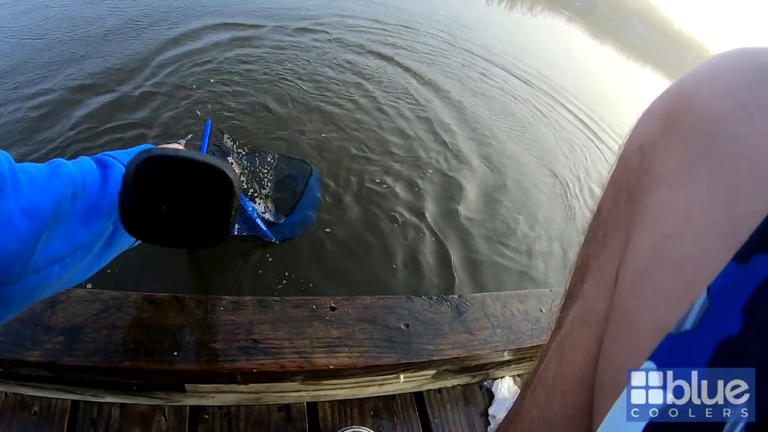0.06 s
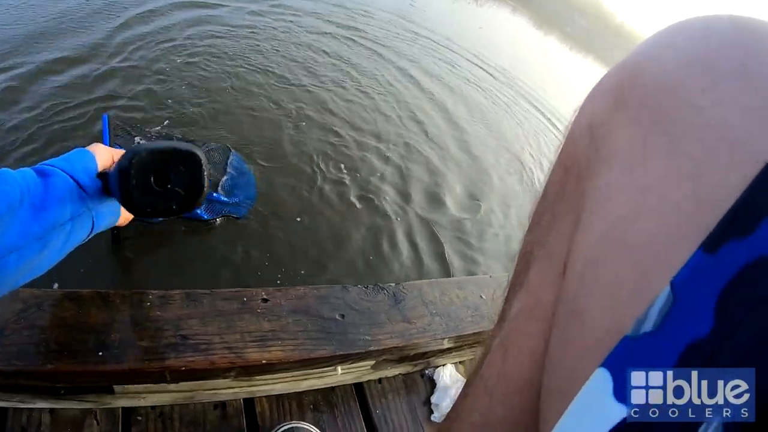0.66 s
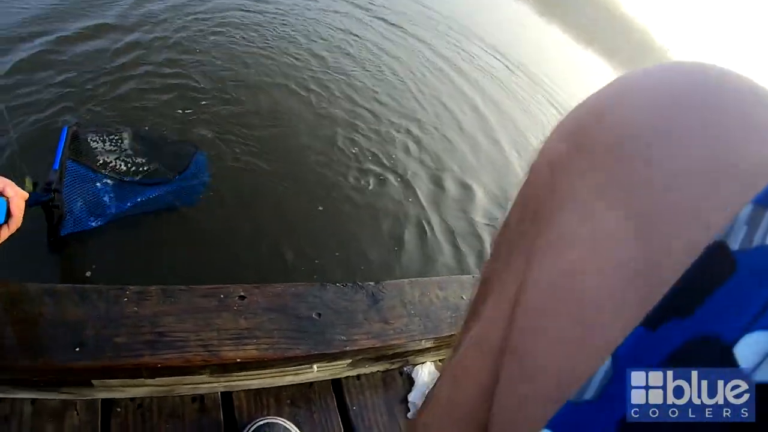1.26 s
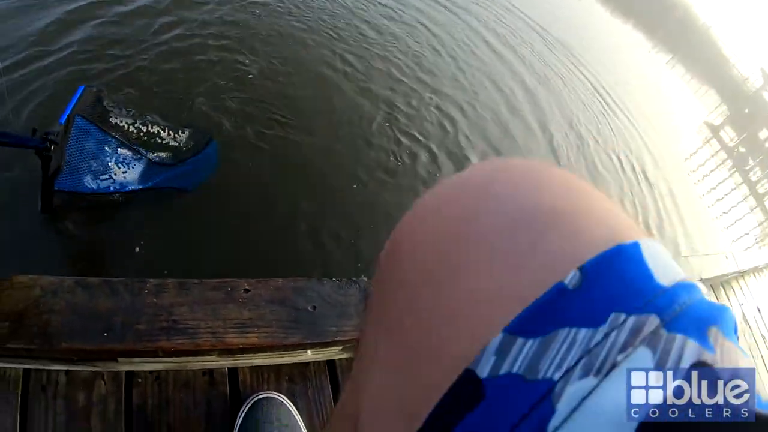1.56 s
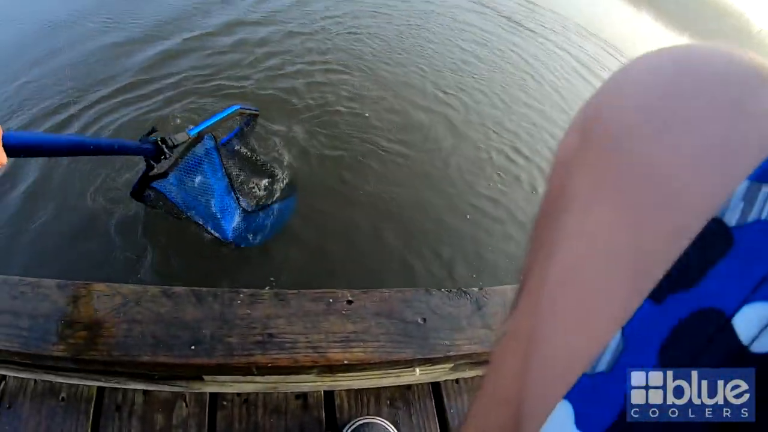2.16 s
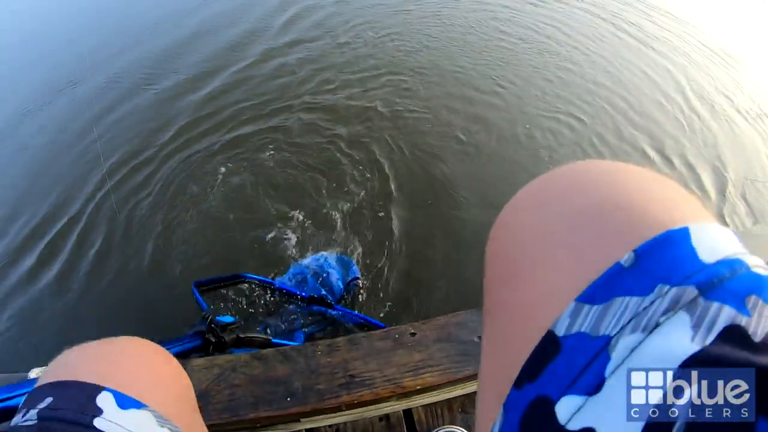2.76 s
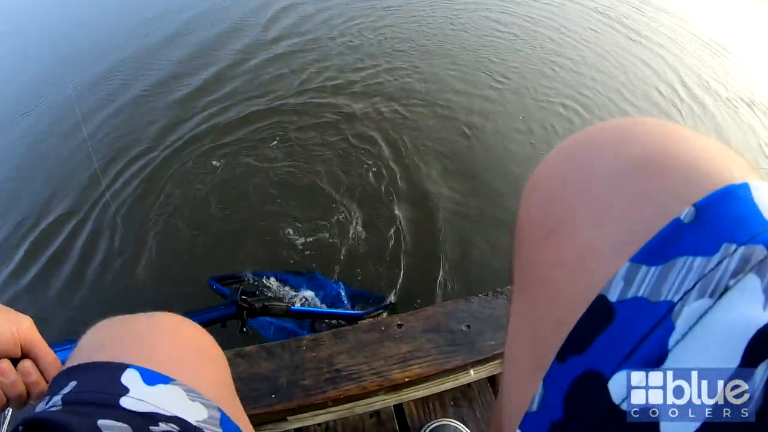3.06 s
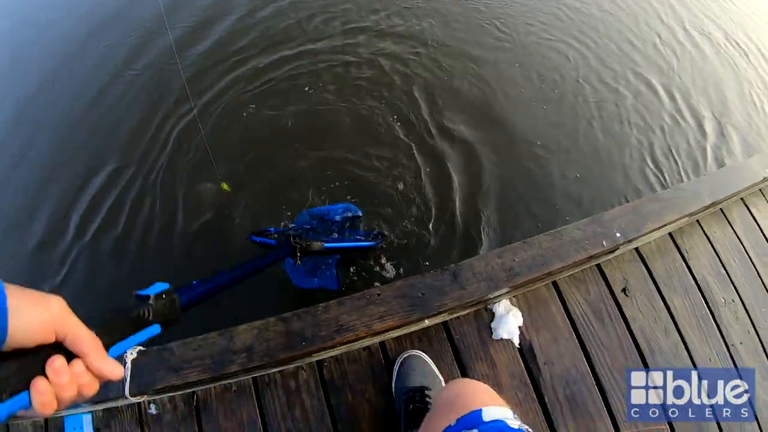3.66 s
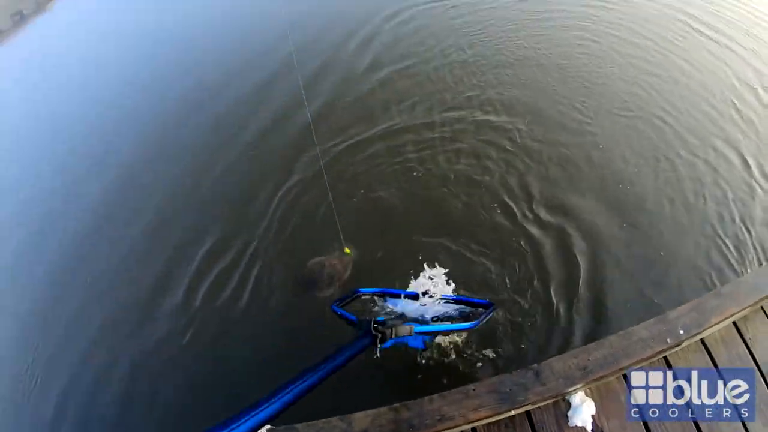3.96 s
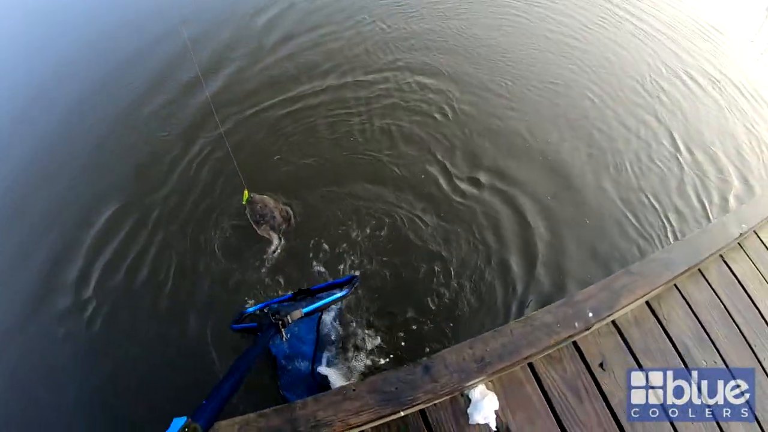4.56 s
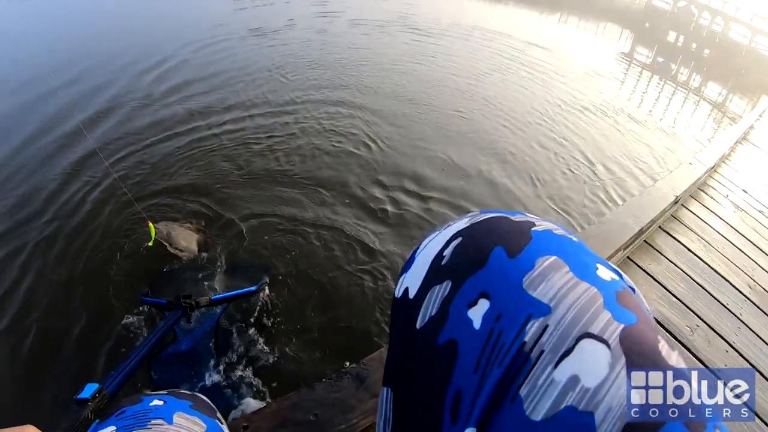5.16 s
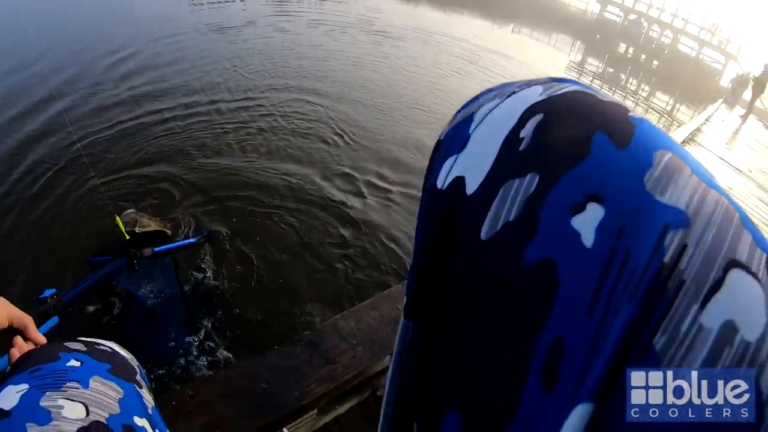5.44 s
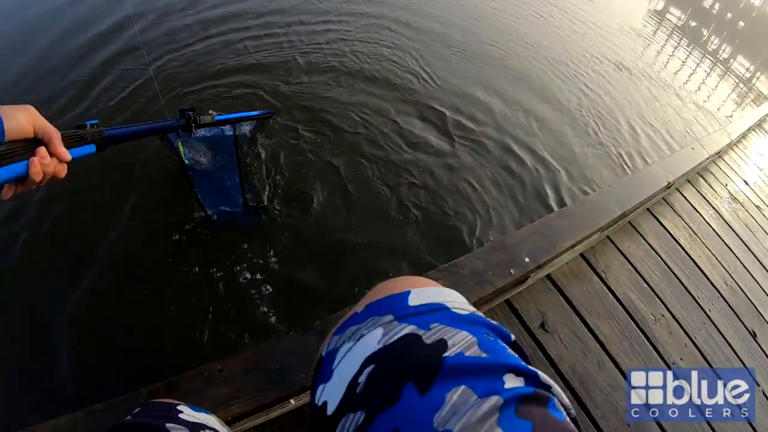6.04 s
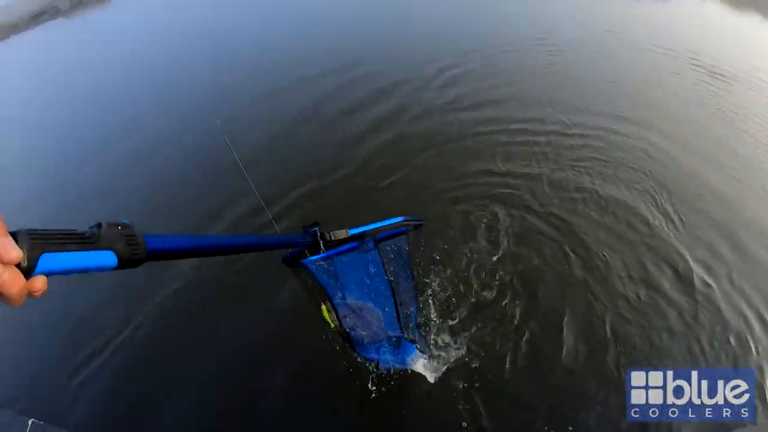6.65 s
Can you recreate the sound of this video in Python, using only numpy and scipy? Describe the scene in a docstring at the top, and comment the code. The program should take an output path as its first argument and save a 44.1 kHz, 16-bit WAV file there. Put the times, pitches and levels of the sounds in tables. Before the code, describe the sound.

Outdoors, a step from a body-worn microphone, water bubbles and drains through a net swept beside a dock. The hoop gives a hollow clack on the wood, followed by plops and a tiny scrape. Amid low thumps on the boards and puffs of wind, a fish splashes and flings drops onto the microphone in two loud, crackling bursts. The water churns, settles and is gently stirred again.

```python
"""Landing net beside a wooden dock

A net is swept through the water, and the bubbles it traps resonate as it gurgles and drains. The hoop
knocks on the dock, the mesh scrapes its edge and feet thump on the planks. A hooked fish splashes, and
two showers of drops strike a body-worn microphone. Light wind and open air lie underneath."""
import sys
import numpy as np
from scipy import signal
from scipy.fft import rfft, irfft, next_fast_len
from scipy.io import wavfile
from scipy.ndimage import uniform_filter1d

SR = 44100
rng = np.random.default_rng(int(sys.argv[2]) if len(sys.argv) > 2 else 0)


def generate_wav(sig):
    """Save sig (samples, or channels by samples) to the path in sys.argv[1] as 16-bit PCM at SR."""
    pcm = np.round(np.clip(np.atleast_2d(sig).T, -1, 1) * 32767).astype(np.int16)
    wavfile.write(sys.argv[1], SR, pcm)


N = 299992

# Shoves of net or fish. Each row: crest, swell and drain times in seconds, gurgle and fizz levels in dB,
# churn (0 separate bubbles, 1 dense froth), depth (0 light surface trickle, 1 hollow gurgle).
WATER_SURGES = [(1.68, 0.092, 0.35, -54, -67, .25, 0.28), (1.82, 0.063, 0.15, -60, -80, 0.2, 0.5),
                (2.06, 0.39, 0.25, -59, -71, 0.15, 0.45), (2.74, 0.4, 0.28, -65.5, -67, 0.55, 0.36),
                (2.87, 0.13, 0.046, -55.5, -56, 0.9, 0.95), (2.995, 0.12, 0.073, -52.5, -59.5, 0.62, 0.46),
                (3.945, 0.15, 0.11, -47.5, -54, 0.85, 0.33), (4.2, 0.39, 0.67, -53, -64.5, 0.76, 0.47),
                (4.455, 0.14, 0.18, -51.5, -54, 0.94, 0.45),
                (4.785, 0.059, 0.042, -47.5, -53.5, 0.45, 0.88), (5.03, 0.28, 0.43, -62.5, -67, 0.54, 0.29),
                (6.12, 0.18, 0.099, -56.5, -68, 0.45, 0.099), (6.35, 0.11, 0.048, -72, -62.5, .3, .1),
                (6.54, 0.17, 0.19, -56.5, -66, 0.68, 0.22), (6.72, 0.34, 0.91, -66, -67, 0.82, .39)]
# Single bubbles that stand out, from low plops to tiny high plips. Each row: start in seconds,
# pitch in Hz, level in dB, t60 in seconds, glide in octaves per t60.
DISTINCT_BUBBLES = [(.812, 256, -40.5, 0.05, -1.5), (1.126, 520, -34, 0.011, 0),
                    (1.319, 916, -47, 0.041, 0.5), (1.607, 986, -42.5, 0.025, 3),
                    (1.627, 385, -44.5, 0.049, 0), (1.652, 3170, -48, .025, 0.6),
                    (1.705, 436, -45.5, 0.15, 0.3), (1.706, 677, -42.5, 0.037, 1.5),
                    (1.764, 593, -44.5, 0.18, 2), (1.772, 1590, -51, 0.052, -1),
                    (1.836, 687, -42.5, 0.072, 0), (1.852, 990, -46, 0.038, 0),
                    (1.887, 650, -29.5, 0.014, 1.5), (1.893, 317, -36.5, 0.19, 0.16),
                    (1.929, 1350, -50.5, 0.1, .3), (1.941, 3360, -48.5, 0.018, -0.5),
                    (1.971, 376, -37.5, 0.23, 0.5), (2.098, 740, -45.5, 0.07, -0.5),
                    (2.099, 3570, -46, 0.015, 0.1), (2.759, 798, -46.5, 0.074, 0.5),
                    (2.798, 780, -44, 0.027, 0.5), (2.969, 443, -30, 0.019, 1),
                    (2.98, 1195, -28.5, 0.014, 0.8), (3.007, 362, -25, 0.023, 0.5),
                    (3.02, 700, -36, 0.028, 2), (3.028, 390, -32, 0.018, -0.5),
                    (3.025, 192, -39, 0.13, 0.5), (3.26, 386, -43, 0.053, 1.7), (3.915, 567, -33, 0.028, 0),
                    (3.931, 483, -38, 0.05, 0), (4.012, 557, -43.5, 0.2, 0.7), (4.198, 690, -44, 0.025, 1),
                    (4.224, 700, -44, 0.073, 1.2), (4.25, 627, -41, .04, -1.5), (4.286, 730, -37, 0.039, 0),
                    (4.484, 450, -43, 0.081, -0.5), (4.777, 520, -41, 0.02, -1.5),
                    (4.7915, 244, -30, 0.05, 2), (4.8, 158, -32, 0.089, 0.5), (4.897, 255, -39.5, 0.058, 2),
                    (4.954, 451, -38.5, 0.048, 1.1), (5.917, 637, -46.5, 0.08, 3.5),
                    (5.93, 1225, -48, 0.033, 1), (5.997, 686, -49, 0.069, 2), (6.05, 773, -51, 0.081, 1),
                    (6.066, 956, -41, 0.039, 1), (6.123, 662, -45.5, 0.1, 0.6),
                    (6.173, 903, -38.5, 0.047, -1.3), (6.419, 1520, -37.5, 0.021, 0.7),
                    (6.435, 1490, -47, 0.032, -0.5), (6.518, 754, -41.5, 0.04, -0.5),
                    (6.664, 1464, -43.5, 0.03, 0)]
# Plips, slaps and ticks of water and tackle. Each row: start in seconds, level in dB, centre in Hz,
# t60 in seconds.
WATER_TICKS = [(1.126, -54, 1500, 0.01), (1.31, -54, 1650, 0.026), (1.7518, -51.5, 5670, 0.023),
               (1.876, -42.5, 1150, 0.031), (1.971, -49.5, 1640, 0.036), (2.713, -45, 3400, 0.013),
               (3.411, -51.5, 2630, 0.074), (3.513, -40.5, 1520, 0.025), (3.566, -46.5, 1330, 0.023),
               (3.757, -34.5, 3180, 0.0031), (3.833, -47.5, 4400, .012), (3.8742, -39.5, 880, 0.018),
               (3.905, -38, 1500, 0.035), (3.923, -38, 1940, 0.028), (4.195, -48.5, 1900, 0.024),
               (4.3214, -41, 2290, 0.014), (4.373, -51, 1200, 0.012), (4.4256, -46, 1540, 0.014),
               (4.49, -46.5, 5150, 0.013), (4.537, -43.5, 1710, 0.02), (4.576, -46, 4270, 0.01),
               (4.6397, -32, 2220, 0.0058), (4.6624, -34, 2150, 0.0081), (4.785, -39.5, 1780, 0.025),
               (4.799, -34.5, 637, 0.019), (4.783, -42.5, 3500, 0.032), (4.798, -36.5, 1660, 0.018),
               (5.075, -41, 1970, 0.017), (5.6657, -37.5, 2300, 0.0079), (5.6653, -32.5, 3870, 0.0067),
               (5.6654, -40, 5530, 0.0062), (6.134, -53, 3200, 0.022), (6.385, -44.5, 3560, 0.013),
               (6.418, -47, 2080, 0.016)]
# Drops striking the microphone. Each row: start in seconds, level in dB.
DROP_HITS = [(3.9666, -14), (3.9727, -7.5), (3.979, -12.5), (3.9827, -14.5), (4.0858, -26), (4.1004, -4),
             (4.117, -8.5), (4.132, -16)]
# Fine spray around the drops. Each row: start in seconds, length in seconds, level in dB.
MIST_SHOWERS = [(3.816, 0.0038, -54.5), (3.961, 0.019, -39.5), (4.085, 0.0049, -55), (4.095, 0.03, -40)]
# The hoop striking the dock. Each row: start in seconds, ring level in dB, crack level in dB.
HOOP_KNOCKS = [(2.8203, -24, -20.5), (2.826, -25.5, -23.5), (2.8306, -41, -31.5), (2.8341, -42, -46),
               (2.84, -40, -38), (2.858, -53, -58), (2.866, -51, -47), (2.8845, -40, -44),
               (2.9013, -43.5, -34.5), (3.0095, -45.5, -38)]
# Modes of hoop and planks. Each row: frequency in Hz, relative level in dB, t60 in seconds.
HOOP_PLANK_MODES = [(145, -13, 0.28), (213, -15, 0.11), (260, 1, .15), (313, -7.5, 0.089), (359, -9.5, 0.1),
                    (466, -8, 0.13), (664, -17, 0.091), (800, 0.5, 0.032), (900, -18, 0.045),
                    (1160, -7, 0.035), (1894, -15.5, 0.037), (2205, -15.5, 0.041), (2905, -16.5, 0.04),
                    (3980, -17.5, 0.04), (4940, -17.5, 0.043)]
# Feet, knees and net on the planks. Each row: start in seconds, level in dB.
PLANK_THUMPS = [(1.356, -38), (1.432, -30), (1.555, -32), (2.827, -33), (3.398, -35.5), (3.866, -25),
                (4.054, -24), (4.294, -30.5), (4.483, -34.5), (5.191, -43), (5.723, -41.5)]
# Puffs of air on the microphone. Each row: peak time in seconds, 1/e half width in seconds, level in dB.
WIND_GUSTS = [(1.08, 0.036, -47), (1.25, 0.027, -40.5), (1.47, 0.26, -53.5), (2.88, 0.078, -48.5),
              (3.866, 0.049, -30.5), (3.991, 0.043, -25.5), (4.15, 0.19, -49.5), (5.72, 0.11, -58)]

# Spectral envelopes. Each row: frequency in Hz, relative level in dB.
GURGLE_SPECTRUM = [(120, -36), (300, 1.5), (500, 6.5), (800, 2.5), (1100, -3), (1600, -6.5), (2600, -12),
                   (5000, -20), (12000, -57)]  # mid-sized bubbles
FIZZ_SPECTRUM = [(700, -4), (1500, 3.5), (2400, 1.5), (4000, -6.5), (6500, -12), (8000, -17), (10000, -21),
                 (15000, -30)]  # tiny bubbles
SNAP_SPECTRUM = [(150, -17), (600, 5), (3000, -17), (15000, -40)]  # a bubble pinching off
CRACK_SPECTRUM = [(150, 12), (450, 22), (900, 11), (1400, 10), (2200, 9.5), (3200, 4), (5000, -1),
                  (6200, -7), (8500, -9.5), (11000, -32), (15000, -52)]  # the sharp onset of a knock
THUD_SPECTRUM = [(60, -13), (200, 0), (420, -7), (1500, -49)]  # its dull body
SCRAPE_SPECTRUM = [(1500, -5), (4800, 0), (8000, -5), (11000, -23)]  # mesh rubbing on wood
BUFFET_SPECTRUM = [(8, -17), (20, -16.5), (32, -2.5), (50, -12.5), (100, -25.5), (200, -30), (500, -45),
                   (1500, -106)]  # wind on the microphone
SWAY_SPECTRUM = [(2, -10.5), (9, 0.5), (22, -18.5), (50, -102)]  # slow pressure swings in the breeze
HUSH_SPECTRUM = [(41, -14), (70, 2.5), (177, -4.5), (291, -10), (417, -10), (572, -17), (734, -15),
                 (1730, -27.5), (7030, -34.5), (13500, -35.5), (15500, -43.5)]  # open air
DRONE_SPECTRUM = [(150, -31), (490, 6), (590, -2), (1100, -45)]  # a far-off drone


def slosh(split_hz=800, clump_db=4, glugs_db=-2, splats_db=-1, chirps_db=-6):
    """Bubble resonance: the mesh traps air; mid-sized bubbles gurgle, tiny ones fizz, dense ones froth."""
    gurgle_gain, fizz_gain, churn, depth = stirring()
    pockets = colour(swarm(308, 2310, cycles=15, spread_db=20.5, rise=0.17, count=2800), GURGLE_SPECTRUM)
    glugs = colour(swarm(402, 1770, cycles=30, spread_db=18, rise=0.46, count=500), GURGLE_SPECTRUM)
    beads = colour(swarm(2030, 8200, cycles=16, spread_db=18, rise=0.041, count=3000), FIZZ_SPECTRUM)
    clumps = amp(clump_db * wander(350))  # water falls back in dollops
    boil = colour(clumps * patter(per_s=3000, spread_db=2), GURGLE_SPECTRUM)
    splats = unit(patter(per_s=120, spread_db=3))  # single drops on the surface
    foam = unit(clumps * patter(per_s=3000, spread_db=0))
    froth = colour(foam + amp(splats_db) * splats, FIZZ_SPECTRUM)
    gurgle = np.sqrt(1 - churn) * unit(pockets + amp(glugs_db) * glugs) + np.sqrt(churn) * boil
    fizz = np.sqrt(1 - churn) * beads + np.sqrt(churn) * froth
    hollow, light = split(gurgle, split_hz)
    # small pockets at the very surface chirp upwards
    chirps = unit(swarm(608, 1670, cycles=32, spread_db=-4, rise=0.72, count=420))
    light += amp(chirps_db) * (1 - depth) ** 2 * chirps
    gurgle = np.sqrt(2 * depth) * hollow + np.sqrt(2 * (1 - depth)) * light
    return gurgle * gurgle_gain + fizz * fizz_gain


def stirring(drop_db=15, roundness=1.21, trickle_gurgle_db=-75, trickle_fizz_db=-80):
    """Incoherent addition: surges sum in power, and the strongest dominates the churn and depth."""
    t = np.arange(0, N + 64, 64) / SR
    crest, swell, drain, gurgle_db, fizz_db, churns, depths = np.transpose(WATER_SURGES)[:, :, None]
    from_crest = np.maximum((crest - t) / swell, (t - crest) / drain)
    fall_db = np.minimum(drop_db * from_crest ** roundness, 100)
    surge_powers = amp(gurgle_db - fall_db) ** 2
    trickle_power = amp(trickle_gurgle_db) ** 2  # the wet mesh trickles between shoves
    gurgle_power = surge_powers.sum(0) + trickle_power
    fizz_power = (amp(fizz_db - fall_db) ** 2).sum(0) + amp(trickle_fizz_db) ** 2
    churn = np.clip(((churns * surge_powers).sum(0) + trickle_power) / gurgle_power, 0, 1)
    depth = np.clip(((depths * surge_powers).sum(0) + 0.5 * trickle_power) / gurgle_power, 0, 1)
    controls = np.sqrt(gurgle_power), np.sqrt(fizz_power), churn, depth
    return [np.interp(np.arange(N) / SR, t, control) for control in controls]


def swarm(low_hz, high_hz, cycles, spread_db, rise, count):
    """Similar damping ratios: bubbles of assorted sizes each ring for roughly the same number of cycles."""
    out = np.zeros(N)
    for k, (when, size, loud, length, glide) in enumerate(rng.random((count, 5))):
        hz = low_hz * (high_hz / low_hz) ** size
        bubble = ring(hz, cycles * (0.5 + length) / hz, 2 * rise * glide, attack=1 / hz)
        start = (k + 2 * when) / count * N / SR
        add(out, start, hz * amp(spread_db * loud ** 2) * bubble)
    return out


def bubbles(snap_db=-15, snap_t60=0.013, flutter_db=2.5, pitch_spread=0.016):
    """Volume oscillation: single bubbles pinch off with a snap and ring, wavering as they deform."""
    out = np.zeros(N)
    flutter = amp(flutter_db * wander(260))
    waver = 1 + pitch_spread * wander(200)
    for start, hz, db, t60, rise in DISTINCT_BUBBLES:
        samples = len(np.arange(0, t60, 1 / SR))
        pitch = hz * waver[round(start * SR):][:samples]
        add(out, start, amp(db) * ring(pitch, t60, rise, attack=0.00058))
        add(out, start, amp(db + snap_db) * burst(SNAP_SPECTRUM, snap_t60, attack=0.00028))
    return out * flutter


def ticks(skirt_db=-11):
    """Heavy damping: each small impact of water or tackle excites one brief, broad resonance."""
    out = np.zeros(N)
    for start, db, hz, t60 in WATER_TICKS:
        resonance = [(hz / 8, -22), (hz / 1.54, skirt_db), (hz, 0),
                     (hz * 1.19, skirt_db), (hz * 4.3, -36), (hz * 8, -50)]
        add(out, start, amp(db) * burst(resonance, t60, attack=0.00047))
    return out


def spray(swing_gain=0.11, port_hz=350, port_t60=0.0091, longest_mist_t60=0.07, specks_db=-6):
    """Impulse response: each drop on the microphone port gives a sharp spike, then a small low swing."""
    hits, mist = np.zeros((2, N))
    t = np.arange(N) / SR
    for start, db in DROP_HITS:
        add(hits, start, amp([db]))
    for start, length, db in MIST_SHOWERS:
        t60 = longest_mist_t60 * min(1, length / 0.02)
        mist += amp(db) * (t > start) * fade(np.maximum(t - start - length, 0), t60)
    hits += mist * (amp(specks_db) * patter(per_s=2100, spread_db=9) + rng.standard_normal(N))
    response = -swing_gain * ring(port_hz, port_t60, attack=0.0001)
    add(response, 0, np.array([-0.12, 0.85, 0.35, -0.097, -0.018]))  # the spike
    return signal.oaconvolve(hits, response)[:N]


def knocks(crack_t60=0.013, thud_db=-3, thud_t60=0.035, vary_db=4, detune=0.0093):
    """Modal vibration: each contact cracks, thuds and rings hoop and planks, differently at every spot."""
    out = np.zeros(N)
    for start, ring_db, crack_db in HOOP_KNOCKS:
        add(out, start, amp(crack_db) * burst(CRACK_SPECTRUM, crack_t60, attack=0.000092))
        add(out, start, amp(ring_db + thud_db) * burst(THUD_SPECTRUM, thud_t60, attack=0.00033))
        for k, (hz, db, t60) in enumerate(HOOP_PLANK_MODES):
            louder, higher = rng.uniform(-1, 1, 2)
            mode = (-1) ** k * ring(hz * (1 + detune * higher), t60)  # neighbours swing opposite ways
            add(out, start, amp(ring_db + db + vary_db * louder) * mode)
    return out


def scrape(start_s=3.405, end_s=3.511, drag_db=-65.5, click_db=-44):
    """Stick-slip friction: the mesh drags over the edge of the dock and comes free with a click."""
    samples = len(np.arange(0, end_s - start_s, 1 / SR))
    slips = colour(patter(per_s=3300, spread_db=-1)[:samples], SCRAPE_SPECTRUM)
    arch = np.sqrt(np.sin(np.pi * np.arange(samples) / samples))
    out = np.zeros(N)
    add(out, start_s, amp(drag_db) * slips * arch)
    add(out, end_s, amp(click_db) * burst(SCRAPE_SPECTRUM, t60=0.019, attack=0.0001))
    return out


def thumps(plank_hz=101.8):
    """Soft impact: feet, knees and net excite one low, heavily damped mode of the planks."""
    out = np.zeros(N)
    for start, db in PLANK_THUMPS:
        add(out, start, 2 * amp(db) * ring(plank_hz, t60=0.07, rise=-0.41, attack=0.0067))
    return out


def dock_reflections(x, t60=0.12, wet_db=-10, echoes_per_s=2000):
    """Scattering: planks, water and the body add a short, faint tail to the direct sound."""
    t = np.arange(SR // 3) / SR
    echoes = rng.choice([-1, 1], len(t)) * (rng.random(len(t)) < echoes_per_s / SR)
    response = echoes * (t > 0.003) * fade(t, t60)
    return x + amp(wet_db) * signal.oaconvolve(x, response / np.linalg.norm(response))[:N]


def air(hush_db=-57.5, drone_db=-63, breeze_db=-60.5, sway_db=-40, sway_exponent=0.75):
    """Turbulence and ambient noise: wind buffets the microphone over a hush and a fading far-off drone."""
    t = np.arange(N) / SR
    hush_noise, sway_noise, buffet_noise, drone_noise = rng.standard_normal((4, N))
    wind = amp(breeze_db) + sum(amp(db) * np.exp(-((t - s) / width) ** 2) for s, width, db in WIND_GUSTS)
    buffet = colour(buffet_noise, BUFFET_SPECTRUM) * wind
    sway = colour(sway_noise, SWAY_SPECTRUM) * amp(sway_db) * (wind / amp(breeze_db)) ** sway_exponent
    hum, hiss = split(amp(hush_db) * colour(hush_noise, HUSH_SPECTRUM), hz=714)
    hum *= amp(2 - 0.5 * t)  # the low part eases by 0.5 dB a second
    drone = colour(drone_noise, DRONE_SPECTRUM) * amp(drone_db - 14.5 * t)
    return buffet + sway + hum + hiss + drone


def ring(hz, t60, rise=0, attack=0.00036):
    """Damped oscillation: a dying sine that glides by `rise` octaves per t60."""
    t = np.arange(0, t60, 1 / SR)
    phase = 2 * np.pi * np.cumsum(hz * 2 ** (rise * t / t60)) / SR
    return np.sin(phase) * fade(t, t60) * (1 - np.exp(-t / attack))


def burst(spectrum, t60, attack):
    """Noise transient: a dying puff whose energy is set by its envelope alone."""
    t = np.arange(4096) / SR
    envelope = fade(t, t60) * (1 - np.exp(-t / attack))
    noise = colour(rng.standard_normal(len(t)), spectrum)
    return unit(noise * envelope) * np.sqrt(np.mean(envelope ** 2))


def patter(per_s, spread_db):
    """Poisson process: random impulses with levels scattered by spread_db."""
    size = amp(spread_db * np.minimum(rng.exponential(1, N), 3))
    return size * (rng.random(N) < per_s / SR)


def wander(samples):
    """Moving average: smoothed noise at rms 1."""
    return unit(uniform_filter1d(rng.standard_normal(N), size=samples))


def colour(x, spectrum):
    """Spectral shaping: x filtered by (Hz, dB) points, at rms 1."""
    hz, db = np.transpose(spectrum)
    size = next_fast_len(len(x))
    gain = amp(np.interp(np.log(np.fft.rfftfreq(size, 1 / SR) + 1), np.log(hz + 1), db))
    return unit(irfft(rfft(x, size) * gain, size)[:len(x)])


def split(x, hz):
    """Complementary filters: the parts of x below and above a frequency."""
    low = signal.sosfiltfilt(signal.butter(2, hz, fs=SR, output="sos"), x)
    return low, x - low


def fade(t, t60):
    """Exponential decay: 60 dB down at t60."""
    return np.exp(-np.log(1000) * t / t60)


def add(mix, start_s, sound):
    """Superposition: mixes a sound in at a time."""
    part = mix[round(start_s * SR):][:len(sound)]
    part += sound[:len(part)]


def amp(db):
    """Decibels to amplitude ratio."""
    return 10 ** (np.asarray(db) / 20)


def unit(x):
    """Normalisation to rms 1."""
    return x / np.sqrt(np.mean(x ** 2) + 1e-20)


def scene():
    """Superposition: water and dock a step away, spray and wind right on the microphone."""
    water_and_hoop = dock_reflections(slosh() + bubbles() + ticks() + knocks())
    return (water_and_hoop + scrape() + thumps() + spray() + air())[None]


def record(dry, cutoff_hz=16200):
    """Band limiting: a low-pass filter removes the highest treble."""
    lowpass = signal.firwin(255, cutoff_hz, window=("kaiser", 8), fs=SR)
    return signal.oaconvolve(dry, lowpass[None], "same")


dry = scene()
out = record(dry)
generate_wav(out)
```